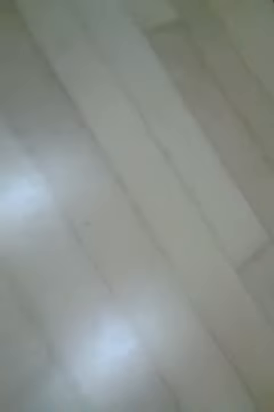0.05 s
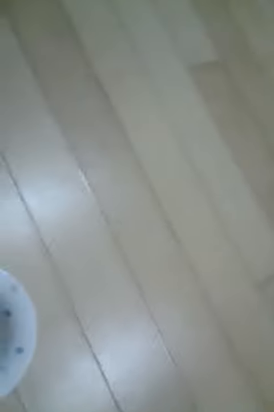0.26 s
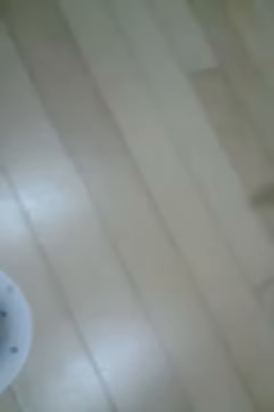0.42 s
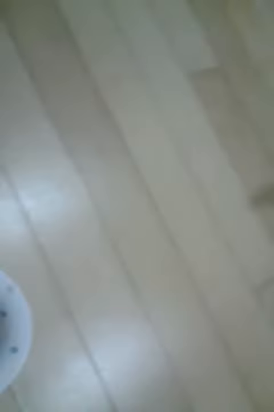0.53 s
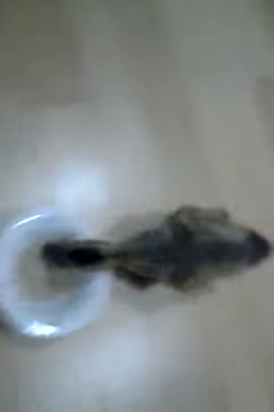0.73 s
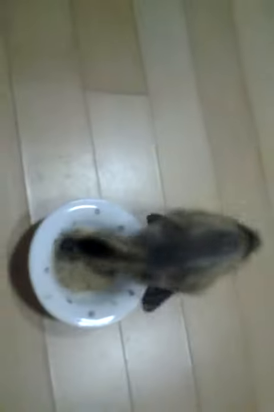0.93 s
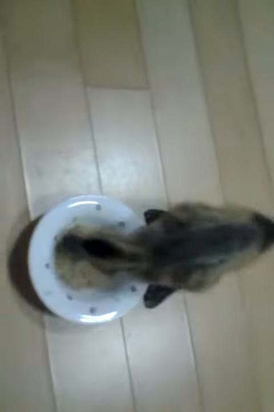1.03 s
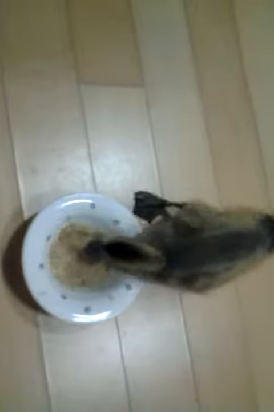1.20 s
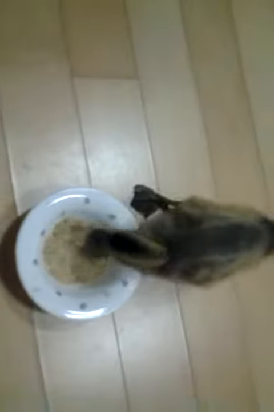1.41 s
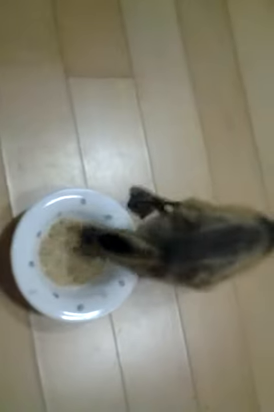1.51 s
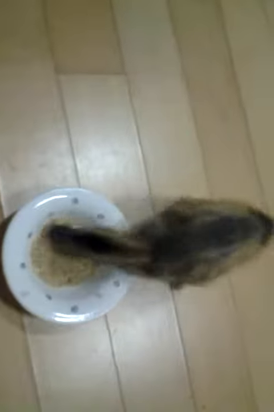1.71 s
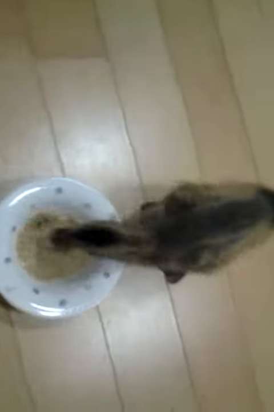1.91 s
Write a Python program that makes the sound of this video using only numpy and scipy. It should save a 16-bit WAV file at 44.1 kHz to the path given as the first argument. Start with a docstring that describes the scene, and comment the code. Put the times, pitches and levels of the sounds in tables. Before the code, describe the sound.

A china dish is set down on a wooden floor close by, clinking loudly at 0.2 and 0.35 seconds, then ringing and rocking in weaker knocks until about 0.6. From 0.7 to 1.35 seconds a duckling gives four faint, thin peeps. Light foot patters and bill ticks on the dish come from about 1 second and again near 1.9, over the soft hiss of a small bare room.

```python
"""China dish and duckling

A small bare room, the microphone close to the wooden floor. A china dish is set down right by it:
it knocks, rocks and rings, shaking the boards, and the hardest blows overload the input.
A duckling then peeps four times in thin arching whistles, pattering on the boards and ticking
its bill on the dish. Room air and a soft hiss lie underneath."""
import sys
import numpy as np
from scipy import signal
from scipy.fft import rfft, irfft
from scipy.io import wavfile
from scipy.ndimage import uniform_filter1d

SR = 44100
rng = np.random.default_rng(int(sys.argv[2]) if len(sys.argv) > 2 else 0)


def log_audio(samples):
    """Write samples as a 16-bit WAV file to the path given in sys.argv[1]."""
    # one column per channel
    frames = np.atleast_2d(samples).T
    # limit to full scale, then quantise
    limited = np.clip(frames, -1, 1)
    pcm = np.round(limited * 32767).astype(np.int16)
    wavfile.write(sys.argv[1], SR, pcm)


N = 85995

# Spectra of the noises. Each row: frequency in Hz, relative level in dB.
AIR_COLOUR = [(15, -46.5), (25, -20), (59, -1), (161, -0.5), (363, -9), (531, -12), (575, -10.5),
              (775, -14), (2050, -16), (2840, -18), (3250, -21), (12900, -29), (16000, -30)]
HISS_COLOUR = [(100, -3), (600, 3), (1500, -1), (4000, 0), (5800, 4.5), (7500, -5.5), (10000, -2),
               (13000, -16), (16000, -13.5)]
PAT_COLOUR = [(60, -16.5), (200, 0.5), (350, 3), (500, -1.5), (750, -0.5), (1300, -12), (2500, -16.5),
              (6000, -28), (16000, -42)]
CRACK_COLOUR = [(100, -10), (900, 4), (2000, -1), (3200, 1.5), (5500, 0), (7000, -8), (10000, 5.5),
                (13000, -2), (16000, -7)]
BOARD_COLOUR = [(40, -26.5), (130, -17.5), (190, -5), (290, -9.5), (390, -5.5), (520, -11), (900, -10.5),
                (3000, -46.5), (16000, -80)]
CLATTER_COLOUR = [(100, -28.5), (500, -19.5), (900, -7.5), (1300, -0.5), (1950, 4), (2450, -5), (3000, -26),
                  (4200, -24), (5800, -19), (7500, -32), (16000, -47)]
TICK_COLOUR = [(300, -26), (1500, 7), (2800, 4.5), (4100, 14), (5300, 5), (6800, 10), (8500, -10),
               (10500, 0.5), (16000, -4)]
RUSTLE_COLOUR = [(500, -27), (5000, -2), (8500, -13), (10500, -4.5), (13500, -2), (16000, -6.5)]
# The rise and fall of the hiss. Each row: time in seconds, level in dB.
HISS_LEVELS = [(0, -53.5), (.1, -53), (.2, -51), (.35, -55.5), (.55, -68), (.7, -65), (.78, -59.5),
               (.9, -69), (1.1, -59.5), (1.35, -72.5), (1.95, -67.5)]
# Small sounds at floor level. Each row: start in seconds, level in dB, decay in seconds.
PATS = [(.012, -42, 0.0022), (.023, -40, 0.0045), (.042, -55, 0.013), (.132, -45, 0.0046),
        (.153, -48.5, 0.0068), (1.098, -57, 0.012), (1.143, -52.5, 0.011), (1.176, -56.5, 0.011),
        (1.283, -46.5, 0.0051), (1.932, -49.5, .008)]
TICKS = [(.59, -60.5, 0.043), (1.013, -39.5, 0.0018), (1.047, -33, 0.0016), (1.108, -52, .003),
         (1.244, -54, 0.0078), (1.885, -45.5, 0.0017), (1.897, -48.5, 0.0042)]
RUSTLES = [(.77, -66, 0.037), (.835, -61.5, 0.026), (1.235, -66, 0.018), (1.53, -58, 0.017)]
# The dish striking the floor. Each row: start in seconds, level in dB, brightness in Hz, rim level
# in dB, rim pitch in Hz, board level in dB, clatter level in dB, levels of the high modes in dB.
KNOCKS = [(0.2106, 7, 5740, -29.5, 2290, -36, -14, (-33.5, -21.5, -31.5, -64, -50)),
          (0.2387, -1, 2340, -22.5, 2278, -37.5, -26, (-45, -39, -45, -55, -62)),
          (0.3627, 5.5, 6450, -22.5, 2266, -39.5, -21.5, (-28, -28, -30, -40.5, -53)),
          (0.4384, -6.5, 3200, -27, 2270, -38, -30.5, (-79, -79, -44, -46, -57)),
          (0.5014, -4.5, 3200, -40, 2270, -47, -30, (-41, -66, -49, -45.5, -70)),
          (0.5486, -17, 1670, -32, 2268, -44, -34.5, (-84, -69, -70, -69, -51)),
          (.718, -33.5, 1502, -60.5, 2340, -64.5, -47.5, (-83, -83, -72, -76, -63))]
# Modes of the dish pressed on the boards. Each row: frequency in Hz, level in dB, T60 in seconds.
PRESSED_MODES = [(800, -23.5, 0.027), (1258, -19.5, 0.034), (1426, -8, 0.0097), (1709.4, -5, .016),
                 (2225, -16.5, 0.011), (5350, -19, 0.0027), (5394, -11.5, 0.0059), (9600, -23, .006)]
# High modes of the free dish. Each row: frequency in Hz, T60 in seconds.
HIGH_MODES = [(5620, 0.066), (6130, 0.043), (8340, .11), (9250, .13), (10220, .13)]
# The duckling's calls. Each row: start in seconds, length in seconds, level in dB, top pitch in Hz,
# places of the top and of the loudest moment from 0 to 1, dip at the top in dB.
PEEPS = [(.709, .05, -44, 3370, .6, .58, -1), (.948, .055, -50, 2720, .52, .5, -3),
         (1.143, .063, -49, 2560, .64, .36, -6), (1.286, .061, -39.5, 3070, .45, .68, -10)]
# The bill setting the rim ringing. Each row: start in seconds, level in dB.
BILL_TOUCHES = [(1.245, -52)]
# The room's decay. Each row: frequency in Hz, T60 in seconds.
ROOM_T60 = [(100, 0.37), (250, 0.9), (600, 0.82), (1500, 0.17), (3200, 0.44), (7000, 0.39), (15000, 0.54)]
# The spectrum of its tail. Each row: frequency in Hz, relative level in dB.
ROOM_COLOUR = [(50, -15), (250, -15), (700, -4), (1700, 16.5), (3500, 9.5), (6000, 1.5), (10000, -9),
               (16000, 8)]
# Echoes off surfaces near the microphone. Each row: delay in seconds, level in dB.
ECHOES = [(.0021, -17), (.0045, -18), (.0093, -16.5), (0.0115, -31.5), (0.0143, -27.5)]


def amp(db):
    return 10 ** (np.asarray(db) / 20)


def unit(x):
    return x / np.sqrt(np.mean(x ** 2) + 1e-20)


def read(points, hz):
    f, value = np.transpose(points)
    return np.interp(np.log(hz + 1), np.log(f + 1), value)


def add(mix, s, sound):
    part = mix[max(round(s * SR), 0):][:len(sound)]
    part += sound[:len(part)]


def noise(colour):
    """Steady noise of rms 1 with the given spectrum."""
    gain = amp(read(colour, np.fft.rfftfreq(N, 1 / SR)))
    return unit(irfft(rfft(rng.standard_normal(N)) * gain, N))


def ring(modes, t):
    """A sum of dying sines."""
    return sum(amp(db - 60 * t / t60) * np.sin(2 * np.pi * hz * t) for hz, db, t60 in modes)


def bursts(rows, colour, rise_s):
    """Brief contacts: noise that rises fast and dies at once."""
    t, out = np.arange(SR // 4) / SR, np.zeros(N)
    for s, db, decay_s in rows:
        envelope = 2 * (1 - np.exp(-t / rise_s)) * np.exp(-t / decay_s)
        add(out, s, amp(db) * envelope * noise(colour)[:len(t)])
    return out


def room(x, wet_db):
    """The bare room at the microphone: direct sound, a few near echoes and a diffuse tail."""
    t = np.arange(SR) / SR
    onset = np.clip((t - .003) / .0029, 0, 1)
    reflections = rng.choice([-1., 1.], SR) * (rng.random(SR) < .15) * onset
    hz, at, spectrum = signal.stft(reflections, SR, nperseg=256)
    gain = amp(read(ROOM_COLOUR, hz)[:, None] - 60 * at / read(ROOM_T60, hz)[:, None])
    tail = signal.istft(spectrum * gain, SR, nperseg=256)[1]
    response = amp(wet_db) * tail / np.linalg.norm(tail)
    response[0] += 1
    for delay, db in ECHOES:
        add(response, delay, amp([db]))
    return signal.fftconvolve(x, response)[:N]


def room_tone(air_db=-59.5):
    """Room air, and a soft hiss that is strongest while the dish is lowered."""
    hiss_db = np.interp(np.arange(N) / SR, *np.transpose(HISS_LEVELS))
    return amp(air_db) * noise(AIR_COLOUR) + amp(hiss_db) * noise(HISS_COLOUR)


def patter():
    """Soft pats on the boards, ticks and scuffs of dish, bill and claws, and faint high rustles."""
    pats = bursts(PATS, PAT_COLOUR, rise_s=.0018)
    ticks = bursts(TICKS, TICK_COLOUR, rise_s=.0013)
    rustles = bursts(RUSTLES, RUSTLE_COLOUR, rise_s=.0049)
    return room(pats + ticks + rustles, wet_db=-7.5)


def dish_knocks(crack_db=-16.5, crack_s=.0011, low_cut_hz=840):
    """China on wood, close up: each contact is a crack and a short clack of the pressed dish."""
    t, out = np.arange(SR) / SR, np.zeros(N)
    for s, db, bright_hz, *_ in KNOCKS:
        modes = [(hz, level - 10 * np.log10(1 + (hz / bright_hz) ** 2), t60)
                 for hz, level, t60 in PRESSED_MODES]
        pole = np.exp(-2 * np.pi * bright_hz / SR)  # a duller contact has less treble
        crack = signal.lfilter([1 - pole], [1, -pole], noise(CRACK_COLOUR)[:SR]) * np.exp(-t / crack_s)
        add(out, s, amp(db) * (ring(modes, t) + amp(crack_db) * crack))
    low_cut = signal.butter(2, low_cut_hz, "high", fs=SR, output="sos")  # the clacks carry little bass
    return room(signal.sosfilt(low_cut, out), wet_db=-22)


def dish_ring(rim_t60=.38, rim_rise_s=.0016, damping_t60=.61, touch_t60=.61):
    """The china rings freely, then dies faster after the next knock; the bill rings the rim too."""
    t, out = np.arange(SR) / SR, np.zeros(N)
    next_times = [row[0] for row in KNOCKS[1:]] + [N / SR]
    for (s, _, _, rim_db, rim_hz, _, _, high_dbs), next_s in zip(KNOCKS, next_times):
        rim = ring([(rim_hz, rim_db, rim_t60)], t) * (1 - np.exp(-t / rim_rise_s))
        high = ring([(hz, db, t60) for (hz, t60), db in zip(HIGH_MODES, high_dbs)], t)
        damping = amp(-60 * np.maximum(t - (next_s - s), 0) / damping_t60)
        add(out, s, (rim + high) * damping)
    for s, db in BILL_TOUCHES:
        add(out, s, ring([(2286, db, touch_t60)], t))
    return room(out, wet_db=-34.5)


def floorboards(decay_s=.016):
    """Each knock shakes a loose rumble out of the boards under the dish."""
    blows = [(s, board_db, decay_s) for s, *_, board_db, _, _ in KNOCKS]
    return room(bursts(blows, BOARD_COLOUR, rise_s=.002), wet_db=2)


def clatter(decay_s=.0034):
    """Each knock throws a midrange burst round the room."""
    blows = [(s, clatter_db, decay_s) for s, *_, clatter_db, _ in KNOCKS]
    return room(bursts(blows, CLATTER_COLOUR, rise_s=.0015), wet_db=.5)


def duckling(pitch_drop=.4, jitter_depth=.018, octave_db=-24, side_db=-15, flutter_hz=600):
    """Thin whistles that arch up and down, with a weak octave and a flutter that adds side tones."""
    out = np.zeros(N)
    for s, length, db, top_hz, top_at, loud_at, dip_db in PEEPS:
        t = np.arange(0, length, 1 / SR)
        u = t / length
        # 0 at the top of the arch, 1 at either end
        away = np.where(u < top_at, (top_at - u) / top_at, (u - top_at) / (1 - top_at + 1e-6))
        jitter = unit(uniform_filter1d(rng.standard_normal(N), 60))[:len(u)]
        pitch_hz = top_hz * (1 - pitch_drop * away ** 2.6) * (1 + jitter_depth * jitter)
        phase = 2 * np.pi * np.cumsum(pitch_hz) / SR
        push = np.exp(-((u - loud_at) / .19) ** 2)
        top = np.exp(-(away / .19) ** 2)
        swell = (.48 + push) * signal.windows.tukey(len(u), .2)
        flutter = 2 * amp(side_db) * np.sqrt(top) * np.sin(2 * np.pi * flutter_hz * t)
        whistle = (amp(dip_db * top) + flutter) * np.sin(phase)
        octave = amp(octave_db) * push * np.sin(2 * phase)
        add(out, s, amp(db) * swell * (whistle + octave))
    return room(out, wet_db=-12)


def scene():
    """Everything that reaches the one microphone."""
    return (room_tone() + patter() + dish_knocks() + dish_ring() + floorboards() + clatter()
            + duckling())[None]


def record(dry):
    """The input overloads with a hard knee; then the highest treble is cut off."""
    ceiling, cutoff_hz = .43, 16200
    clipped = dry / (1 + (dry / ceiling) ** 6) ** (1 / 6)
    low_pass = signal.firwin(255, cutoff_hz, window=("kaiser", 9), fs=SR)
    return signal.oaconvolve(clipped, low_pass[None], "same")


dry = scene()
out = record(dry)
log_audio(out)
```